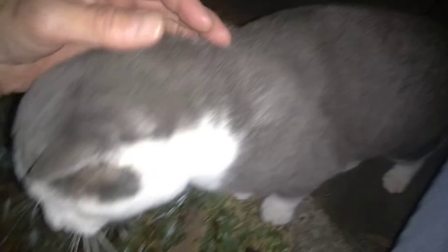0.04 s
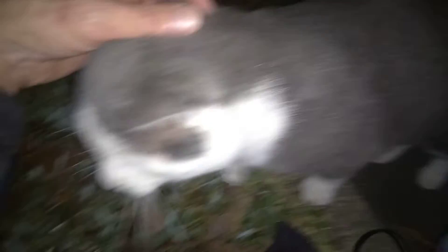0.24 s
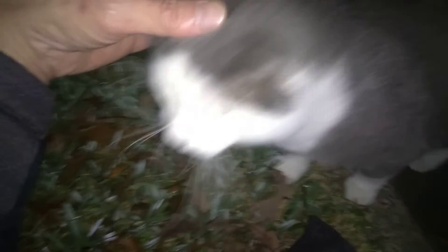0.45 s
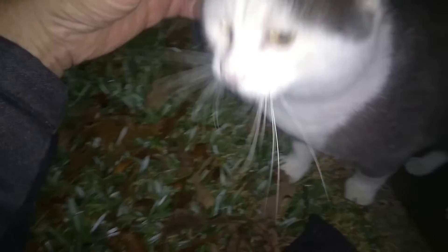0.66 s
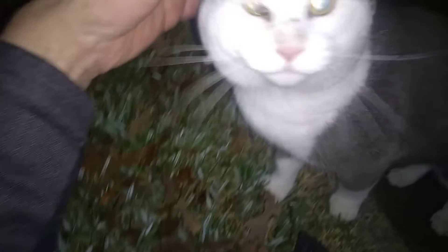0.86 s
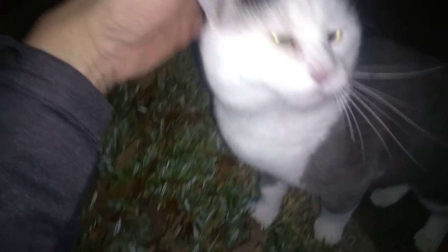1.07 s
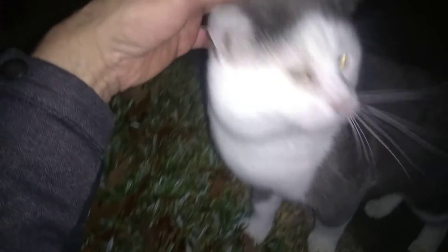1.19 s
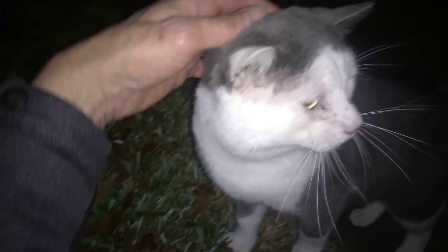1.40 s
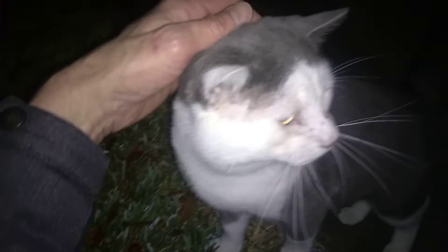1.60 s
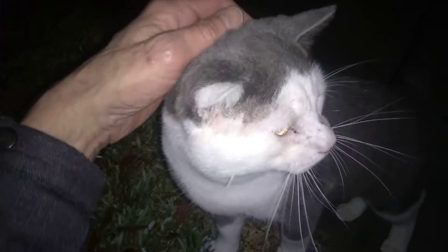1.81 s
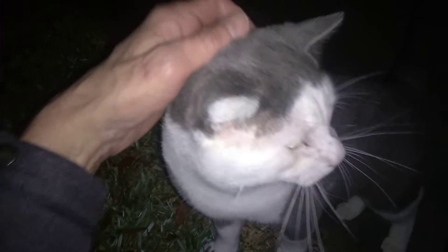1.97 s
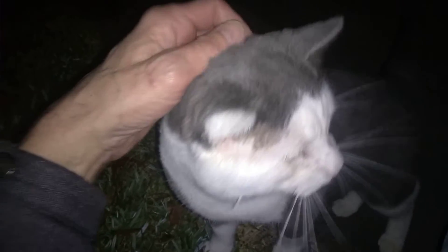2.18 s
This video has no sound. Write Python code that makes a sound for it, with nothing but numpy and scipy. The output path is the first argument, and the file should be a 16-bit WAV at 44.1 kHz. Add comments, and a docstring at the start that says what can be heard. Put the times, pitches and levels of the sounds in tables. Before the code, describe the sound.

A cat purrs close by, twice breaking into rolling trills, with a sharp knock between them.

```python
"""A cat purrs close to a camera's two microphones while a hand strokes its head, outdoors at night.
The purr is a low flutter of noise puffs; twice it breaks into a trill of short, mostly falling coos,
swept tones about 25 a second. The hand makes fur swishes, ticks and scuffs of shaped noise.
Knocks ring the camera case, once sharply, and the grip makes soft low bumps. Far off, traffic is
shaped noise, and a machine hums in wavering tones over a low rumble."""
import sys
import numpy as np
from scipy import signal
from scipy.fft import rfft, irfft
from scipy.io import wavfile
from scipy.ndimage import uniform_filter1d

SR = 44100
rng = np.random.default_rng(int(sys.argv[2]) if len(sys.argv) > 2 else 0)


def to_wav(s):
    """Save 16-bit WAV."""
    ch = np.atleast_2d(s).T  # columns
    pcm = np.round(np.clip(ch, -1, 1) * 32767)  # PCM
    wavfile.write(sys.argv[1], SR, pcm.astype(np.int16))


N = 99225  # samples, 2.25 s

# Colours of noise give relative density in dB per Hz; the level is set separately.
# Far traffic and air: colour [f/Hz, level/dB]
TRAFFIC_COLOUR = [(100, -17.5), (300, -6), (550, -6), (700, -1.5), (920, 2), (1300, -4), (1600, -11),
                  (2100, -13), (3500, -29), (5000, -26.5), (9000, -29), (14000, -43)]
# Far traffic and air: strength [t/s, level/dB]
TRAFFIC_LEVEL = [(0, -60.5), (.15, -58.5), (.3, -54), (.6, -57.5), (.85, -56.5), (1.08, -53.5),
                 (1.3, -56.5), (1.5, -57), (1.68, -56), (1.95, -56), (2.25, -58.5)]
# Low outdoor rumble: colour [f/Hz, level/dB]
RUMBLE_COLOUR = [(25, -24.5), (45, -15.5), (75, -3.5), (160, -4), (240, -8.5), (400, -13), (700, -25.5),
                 (2000, -53)]
# Rumble, and the hum that swells with it: strength [t/s, level/dB]
RUMBLE_LEVEL = [(0, -56.5), (.2, -55.5), (.4, -53), (.75, -51), (1.05, -52.5), (1.25, -53), (1.6, -53),
                (1.85, -52), (2.05, -55), (2.25, -58.5)]
# Machine tones [f/Hz, level over the rumble/dB, phase lead of the left/rad, pitch wander/share of f]
HUM_TONES = [(120.1, -4.5, -0.96, 0.0245), (238.4, -13, -1.25, 0.0146), (878.5, -13.5, -0.45, 0.00679)]
# Swelling and fading of the low hum tones [t/s, level/dB]
HUM_SWELL = [(0, 1), (.28, -4), (.4, 3), (.55, -1.5), (1.05, -1), (1.3, 2.5), (1.6, 2), (1.8, -1.5),
             (2.25, -2.5)]
HUM_FLICKER_DB = 2.5

# Knocks on the camera, the sharp one first [t/s, peak level of the ring/dB, contact time/s]
KNOCKS = [(.4826, -10, .0001), (.973, -35, 0.0017)]
# Response of the camera case [f/Hz, level/dB]
CASE_RESPONSE = [(25, -53), (60, -31), (110, 0), (180, 0), (330, -1.5), (550, -12), (900, -9.5),
                 (1300, -13.5), (1900, -23.5), (2800, -33), (3400, -42), (4200, -31), (5300, -43.5),
                 (6200, -30), (8000, -57), (14000, -77)]
# Soft bumps as the grip shifts and rocks the camera [t at the centre/s, level/dB, f/Hz, half-length/s]
GRIP_BUMPS = [(.985, -40, 85.7, .015), (1.645, -56, 88.4, 0.02), (1.754, -48, 81.6, .022)]
CASE_LAG_S, CASE_RIGHT_DB = 0.000467, -1.8  # handling at the right microphone
CRACK_DB, CRACK_DECAY_S, CRACK_HZ = -40, 0.0001, 7800  # bright edge of the sharp knock
THUD_DB, THUD_DECAY_S, THUD_HZ = -25, 0.008, 96  # the whole camera rocks after the knock

# Hand on fur: strength of the swish [t/s, level/dB]
SWISH_LEVEL = [(0, -70), (.15, -69.5), (.29, -63.5), (.48, -64.5), (.62, -64.5), (.73, -71.5), (.87, -66),
               (1.07, -68.5), (1.33, -67), (1.6, -71), (1.9, -72), (2.25, -72)]
# Hand on fur: colour of the swish [f/Hz, level/dB]
SWISH_COLOUR = [(300, -29), (1500, 6.5), (2700, 1), (3700, 7), (4300, 3.5), (5200, -1), (6400, -9),
                (8000, -6.5), (10000, -11.5), (14000, -12)]
# Brighter brushes over the fur [t at the centre/s, half-length/s, level/dB]
BRUSHES = [(0.298, 0.071, -74), (0.45, 0.034, -72), (0.535, .05, -75), (0.837, .06, -80.5),
           (1.06, 0.026, -70)]
# Colour of the brushes [f/Hz, level/dB]
BRUSH_COLOUR = [(1500, -31), (4000, 14), (7000, -5), (9000, 9.5), (14000, -22)]
# Small ticks of fur and sleeve [t/s, onset level before halving/dB, brightness/dB per octave]
TICKS = [(.262, -49, -2.5), (0.516, -35, -6), (0.603, -47, -3), (.621, -45, -8), (.855, -44.5, -4),
         (1.643, -58, 1), (1.819, -50, 1), (2.143, -52.5, 7.5)]
# Colour of a tick before its brightness tilt [f/Hz, level/dB]
TICK_COLOUR = [(300, 5), (1100, 10), (2500, 10.5), (4000, -3.5), (6000, 5), (9000, -11), (14000, -19)]
# Soft scuffs of the hand [t/s, onset level before halving/dB]
SCUFFS = [(0.568, -38), (0.7442, -40), (0.783, -44), (1.793, -45.5), (1.894, -41.5), (2.011, -48)]
# Colour of the scuffs [f/Hz, level/dB]
SCUFF_COLOUR = [(60, -23), (200, -1.5), (550, -2.5), (900, -1.5), (1400, -12.5), (2200, -20.5), (8000, -44)]
TICK_DECAY_S, TICK_PIVOT_HZ, SCUFF_DECAY_S = 0.0024, 3000, 0.01

# Strength of the low purr [t/s, level/dB]
PURR_LEVEL = [(0, -55.5), (.28, -57.5), (.4, -54.5), (.55, -54), (.72, -50.5), (.87, -56.5), (1.03, -53),
              (1.35, -52.5), (1.6, -52.5), (1.9, -49.5), (2.05, -53), (2.25, -55.5)]
# Chest and throat: colour of the purr [f/Hz, level/dB]
CHEST_COLOUR = [(30, -36), (50, -5), (75, 5.5), (130, -1), (190, 3), (330, -9), (550, -25), (880, -7.5),
                (1300, -20.5), (2000, -33.5), (3600, -43.5), (6000, -51), (14000, -51)]
# Throat resonance, strongest between the two trills: colour [f/Hz, level/dB]
THROAT_COLOUR = [(150, -32), (205, -8), (240, 0.5), (285, -14), (450, -35), (2000, -67)]
# Throat resonance: strength [t/s, level/dB]
THROAT_LEVEL = [(.45, -75), (.58, -55), (.95, -58.5), (1.15, -70)]
PURR_HZ, PURR_JITTER_CYCLES, PUFF_DECAY_S = 24.86, 0.1, 0.011

# Voiced purr pulses [t at the centre/s, level/dB, f/Hz, half-length/s, fall/octaves per s]
COOS = [(0.046, -48.5, 432, 0.0024, 0), (.083, -48, 463, 0.0054, 11), (0.163, -45.5, 430, 0.0061, 21),
        (0.204, -40, 439, 0.0045, 2.5), (.247, -43.5, 439, 0.0046, 0), (.286, -43.5, 447, 0.0055, -1),
        (0.325, -41, 426, 0.0058, 12.5), (0.365, -50.5, 442, 0.0062, -4), (1.079, -45, 368, 0.0031, 11.5),
        (1.1165, -32.5, 354, 0.0042, 7.5), (1.16, -38.5, 426, 0.0041, -10), (1.244, -35, 443, 0.0066, 6),
        (1.2837, -35, 402, .0054, 30), (1.325, -35.5, 353, 0.0068, 15.5),
        (1.365, -38.5, 356.6, 0.007, 25.5)]
# Overtones of a coo, from the second harmonic up [level over the fundamental/dB]
COO_OVERTONES = [-16, -22.5]
# Lead of the left microphone as the head turns toward the camera [t/s, lead/s]
HEAD_LEAD = [(.2, -.0003), (1.25, -.00013)]
# Rasp of the larynx as it opens: colour [f/Hz, level/dB]
RASP_COLOUR = [(300, -7), (1000, -11), (2200, -1), (3300, 4), (4500, -11), (8000, -38), (14000, -28)]
THUMP_LEAD_S, THUMP_HZ, THUMP_DB = 0.012, 136, -13.5  # level relative to the coo
RASP_LEAD_S, RASP_DECAY_S, RASP_DB = 0.012, 0.0018, -33.5  # added to half the coo's dB

# Lead of the left microphone for diffuse sound [f/Hz, phase/rad]
LEFT_LEAD = [(60, -2.1), (110, -1.3), (260, -1.2), (430, -.4), (860, -.2), (1200, 0.42), (1500, 1),
             (1830, 1.73), (2150, 3.14), (14000, 37.5)]
# Likeness of the two microphones for diffuse sound [f/Hz, correlation/0-1]
LIKENESS = [(50, 0.58), (250, 0.66), (550, 0.58), (900, 0.99), (2200, 1), (4000, 0.67), (8000, 0.42),
            (14000, 0.099)]
# Balance of the right microphone [f/Hz, level/dB]
RIGHT_BALANCE = [(60, 0.5), (300, 1), (1000, -0.2), (2500, -0.4), (5000, -2.5), (9000, -3), (14000, -3)]
TOP_HZ = 14200


def undb(db):
    """Decibels to gain."""
    return 10 ** (np.asarray(db) / 20)


def curve(table, at):
    """Straight lines through the rows of a table."""
    return np.interp(at, *np.array(table, float).T)


def unit(x):
    """Scale to rms 1."""
    return x / np.sqrt(np.mean(x ** 2))


def freqs():
    """Frequency of each spectrum bin in Hz."""
    return np.arange(N // 2 + 1) * SR / N


def colour(x, points):
    """Causal minimum-phase filter through (Hz, dB) points, by folding the cepstrum."""
    hz, db = np.array(points, float).T
    level_db = np.interp(np.log(freqs() + 1), np.log(hz), db)
    cepstrum = irfft(np.log(undb(level_db)), N)
    cepstrum[1:N // 2] *= 2
    cepstrum[N // 2:] = 0
    return irfft(rfft(x) * np.exp(rfft(cepstrum)), N)


def walk(rate):
    """Smoothed random drift of rms 1, with about rate new values a second."""
    hold = int(SR / rate)
    steps = np.repeat(rng.standard_normal(N // hold + 1), hold)
    smooth = uniform_filter1d(uniform_filter1d(steps, hold), hold)
    return unit(smooth[:N])


def rush(envelope, points):
    """Shaped noise at two microphones: partly alike, with a phase lead between them."""
    left, other = rfft(rng.standard_normal((2, N)) * envelope)
    alike = np.clip(curve(LIKENESS, freqs()), 0, 1)
    right = alike * left + np.sqrt(1 - alike ** 2) * other
    right = right * np.exp(-1j * curve(LEFT_LEAD, freqs()))
    return colour(irfft(np.array([left, right]), N), points)


def bursts(t, rows, decay_s, points):
    """Short rubs: noise that starts at once and dies away exponentially."""
    envelope = sum(undb(db) * (t >= at) * np.exp(-np.abs(t - at) / decay_s) for at, db in rows)
    envelope_rms = np.sqrt(np.mean(envelope ** 2))
    return unit(rush(envelope, points)) * envelope_rms / 2


def night(t):
    """Far traffic as noise, and a low rumble that swells with the wavering sine tones of a machine."""
    traffic = unit(rush(undb(0.54 * walk(14.52)), TRAFFIC_COLOUR)) * undb(curve(TRAFFIC_LEVEL, t))
    drone = unit(rush(1, RUMBLE_COLOUR))
    for hz, db, lead, wander in HUM_TONES:
        phase = 2 * np.pi * np.cumsum(hz * (1 + wander * walk(20))) / SR
        swell_db = curve(HUM_SWELL, t) if hz < 500 else 0
        gain = np.sqrt(2) * undb(db + swell_db + HUM_FLICKER_DB * walk(9.98))
        drone = drone + gain * np.sin(np.array([phase, phase - lead]))
    return traffic + drone * undb(curve(RUMBLE_LEVEL, t))


def handling(t):
    """Contact pulses ring the case, plus crack, thud and bumps; the right hears all late and inverted."""
    out = np.zeros(N)
    for at, db, contact_s in KNOCKS:
        age = np.maximum(t - at, 0)
        ring = colour(age * np.exp(-2 * age / contact_s), CASE_RESPONSE)
        out += undb(db) * ring / np.abs(ring).max()
    age = np.maximum(t - KNOCKS[0][0], 0)  # since the sharp knock
    crack = np.sin(2 * np.pi * CRACK_HZ * age) * np.exp(-age / CRACK_DECAY_S)
    thud = -np.sin(2 * np.pi * THUD_HZ * age) * np.exp(-age / THUD_DECAY_S)
    out += undb(CRACK_DB) * crack + undb(THUD_DB) * thud
    for at, db, hz, width in GRIP_BUMPS:
        swell = np.exp(-((t - at) / width) ** 2)
        out += undb(db) * np.cos(2 * np.pi * hz * (t - at)) * swell
    return np.array([out, -undb(CASE_RIGHT_DB) * np.interp(t - CASE_LAG_S, t, out)])


def stroking(t):
    """Rubbing hairs: a grainy noise swish with brighter brushes, ticks and scuffs."""
    grain = undb(1.75 * walk(300) + 1.7 * walk(22.74))
    sound = unit(rush(grain, SWISH_COLOUR)) * undb(curve(SWISH_LEVEL, t))
    brush_gain = sum(undb(db) * np.exp(-((t - at) / width) ** 2) for at, width, db in BRUSHES)
    sound = sound + unit(rush(1, BRUSH_COLOUR)) * brush_gain
    for at, db, tilt in TICKS:
        tilted = [(hz, d + tilt * np.log2(hz / TICK_PIVOT_HZ)) for hz, d in TICK_COLOUR]
        sound = sound + bursts(t, [(at, db)], TICK_DECAY_S, tilted)
    return sound + bursts(t, SCUFFS, SCUFF_DECAY_S, SCUFF_COLOUR)


def low_purr(t):
    """Slightly uneven puffs from the larynx, in step with the coos, sound in chest and throat."""
    marks = np.array([0] + [row[0] - THUMP_LEAD_S for row in COOS] + [t[-1]])
    # whole numbers of puffs between marks keep the flutter in step
    cycles = np.cumsum(np.round(np.diff(marks, prepend=0) * PURR_HZ))
    position = np.interp(t, marks, cycles) + PURR_JITTER_CYCLES * walk(12)
    age = position % 1 / PURR_HZ
    puffs = np.exp(-age / PUFF_DECAY_S)
    chest = unit(rush(puffs, CHEST_COLOUR)) * undb(curve(PURR_LEVEL, t))
    throat = unit(rush(puffs, THROAT_COLOUR)) * undb(curve(THROAT_LEVEL, t))
    return chest + throat


def trill(t):
    """Each voiced pulse is a tiny rasp and a soft thump, then a few cycles of a level or gliding tone."""
    out = np.zeros(N)
    for (at, db, hz, width, fall), start in zip(COOS, rng.random((len(COOS), 2))):
        near = np.abs(t - at) < 4 * width
        u = t[near] - at
        phase = 2 * np.pi * (start[0] + np.cumsum(hz * 2 ** (-fall * u)) / SR)
        tone = np.sin(phase)
        for k, overtone_db in enumerate(COO_OVERTONES):
            tone += undb(overtone_db) * np.sin((k + 2) * phase)
        coo = tone * np.exp(-(u / width) ** 2)
        thump = np.sin(2 * np.pi * (THUMP_HZ * u + start[1]))
        thump *= np.exp(-((u + THUMP_LEAD_S) / width) ** 2)
        out[near] += undb(db) * (coo + undb(THUMP_DB) * thump)
    pair = np.array([out, np.interp(t - curve(HEAD_LEAD, t), t, out)])
    # the rasp grows half as fast in dB as the coo
    rasps = [(at - RASP_LEAD_S, db / 2 + RASP_DB) for at, db, *_ in COOS]
    return pair + bursts(t, rasps, RASP_DECAY_S, RASP_COLOUR)


def scene():
    """Background, hand and cat with the right side's balance, then the handling of the camera."""
    t = np.arange(N) / SR
    left, right = night(t) + stroking(t) + low_purr(t) + trill(t)
    return np.array([left, colour(right, RIGHT_BALANCE)]) + handling(t)


def record(dry):
    """Ease in and out over 100 samples, then cut the top steeply with an elliptic low-pass."""
    from_edge = np.minimum(np.arange(N), np.arange(N)[::-1])
    ease = np.minimum(1, from_edge / 100)
    low_pass = signal.ellip(10, 0.2, 70, TOP_HZ, fs=SR, output="sos")
    return signal.sosfilt(low_pass, dry * ease)


dry = scene()
out = record(dry)
to_wav(out)
```